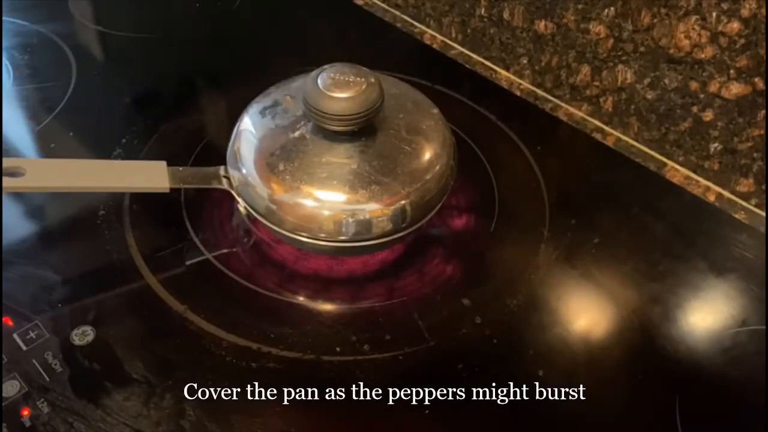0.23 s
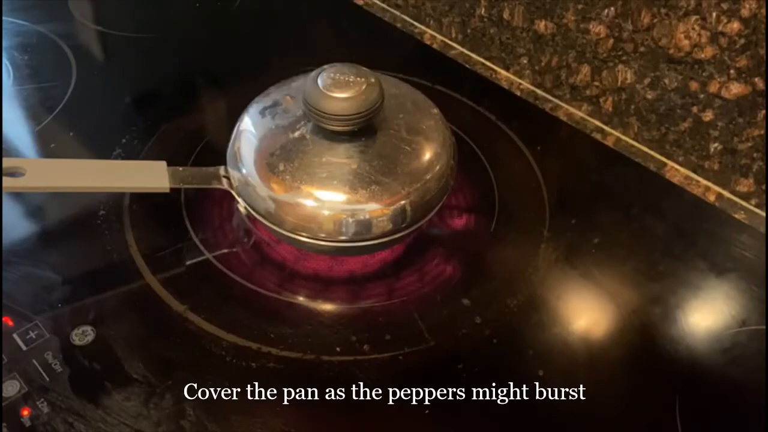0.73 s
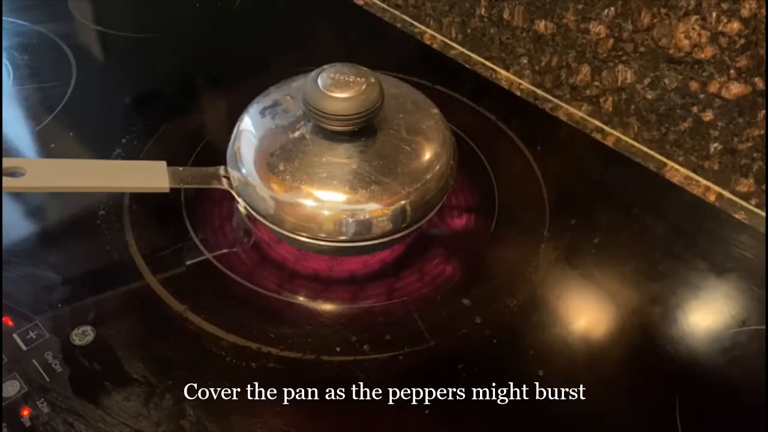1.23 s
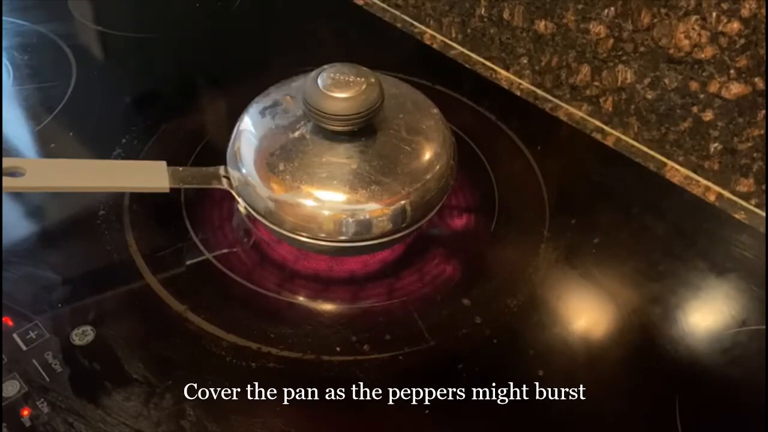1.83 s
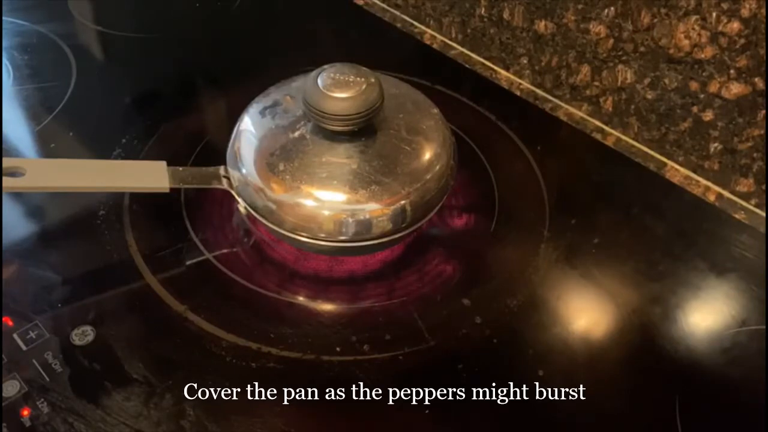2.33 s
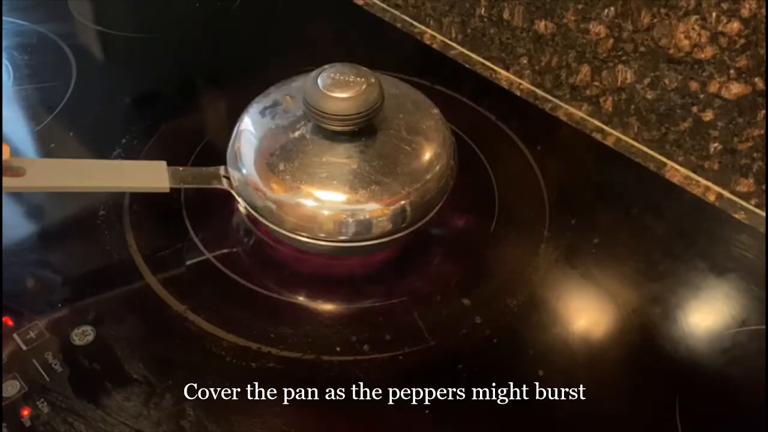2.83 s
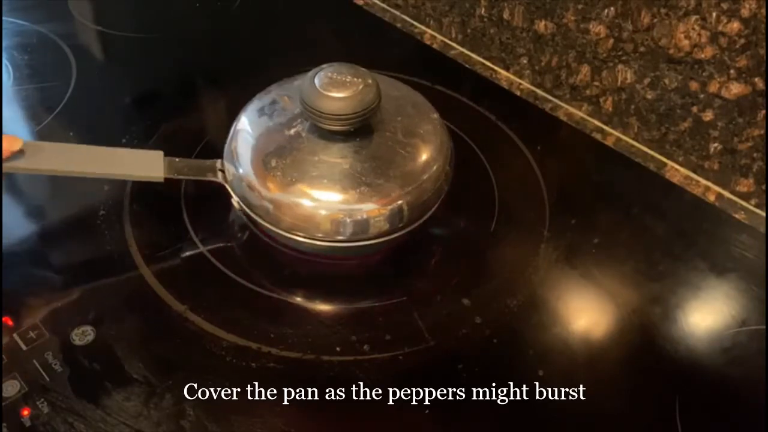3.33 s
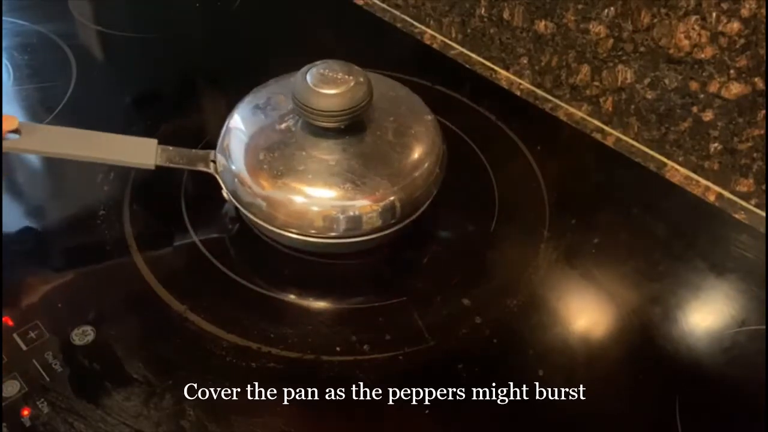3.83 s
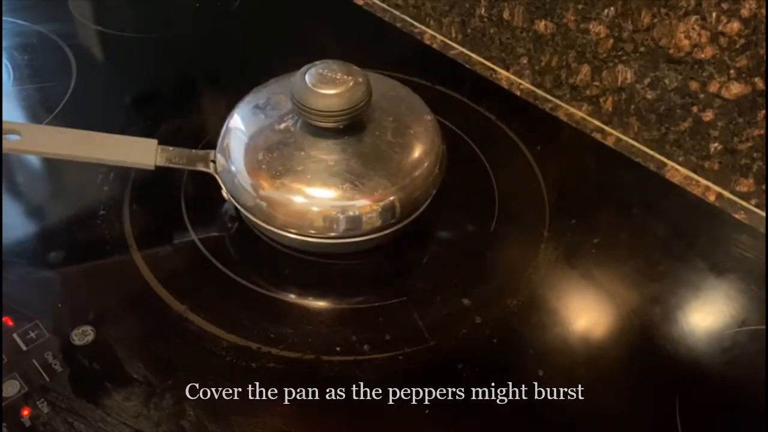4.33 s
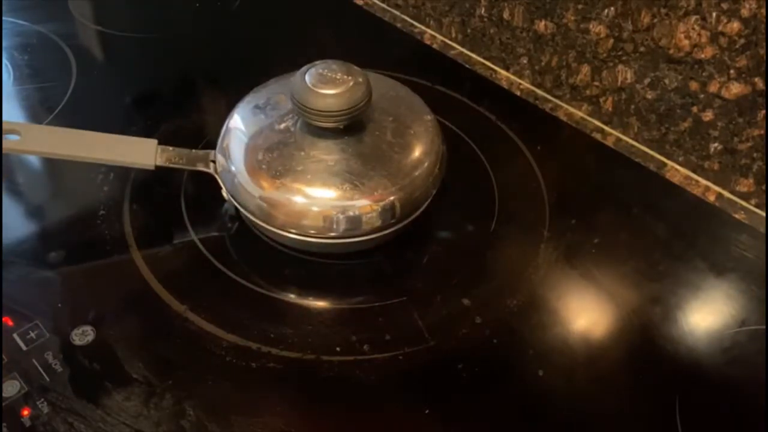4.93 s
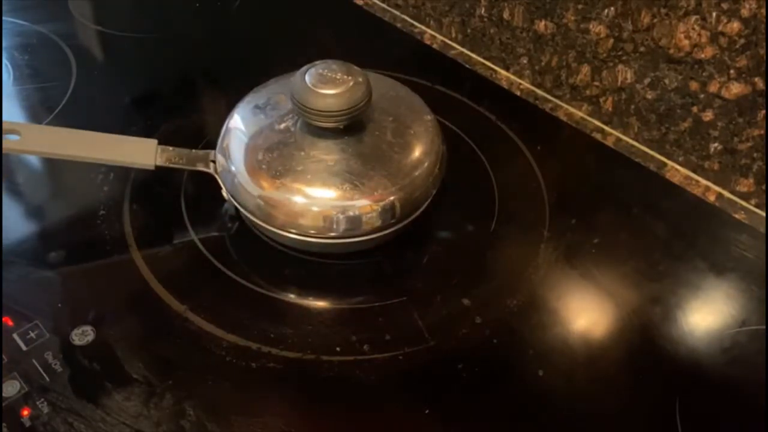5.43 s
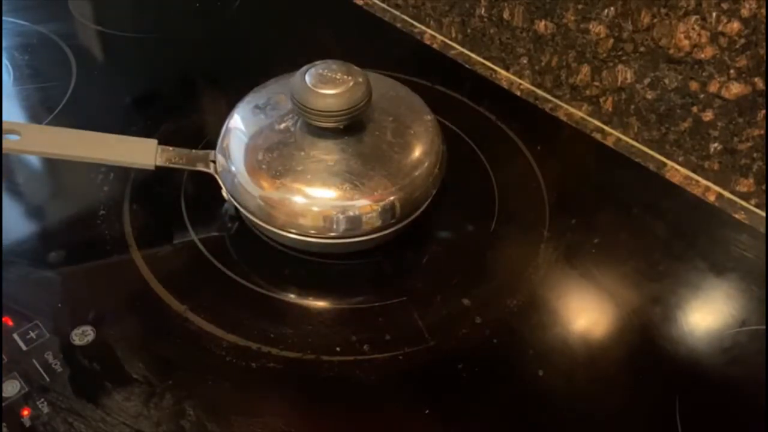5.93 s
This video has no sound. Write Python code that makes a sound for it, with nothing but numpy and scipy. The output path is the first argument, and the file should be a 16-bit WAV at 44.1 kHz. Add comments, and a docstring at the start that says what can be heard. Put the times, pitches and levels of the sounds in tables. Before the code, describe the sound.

A kitchen fan runs throughout, a steady low hum and rumble with a softer rush of air. In front of it, peppers fry quietly in a small covered steel pan. Oil spits against the lid from start to finish, making faint, high, gritty crackles, several a second at uneven intervals, each with a trace of metallic ring. At about 2.2 seconds the hot metal gives a small rough tick. Around 3.3 and 3.5 seconds the pan is nudged, rubbing very softly over the glass hob. Just before 5 seconds come two sharper, dry ticks in quick succession. A fine sizzle builds under the lid from about 4.6 seconds, flaring unevenly, strongest around 5.5 seconds and carrying on to the end at about 6 seconds. The whole sound is quiet and fairly close, with a short reverberation from hard kitchen walls.

```python
"""A kitchen fan hums and rushes while droplets of oil spit faintly against the lid of a small steel pan.
Peppers are frying in it on a glass hob: each bursting droplet is an impulse that excites the lid's modes,
and the hot metal slips with a few sharper ticks. The pan, nudged by its handle, rubs over the glass;
soon a fine sizzle swells under the lid as juice flashes to steam in the oil."""
import sys
import numpy as np
from scipy import signal
from scipy.io import wavfile

SR = 44100
rng = np.random.default_rng(int(sys.argv[2]) if len(sys.argv) > 2 else 0)


def to_wav(s):
    """Save 16-bit WAV."""
    ch = np.atleast_2d(s).T  # columns
    pcm = np.round(np.clip(ch, -1, 1) * 32767)  # PCM
    wavfile.write(sys.argv[1], SR, pcm.astype(np.int16))


N = 273067
TIME = np.arange(N) / SR

# large droplets: t/s, relative level/dB, spectral tilt/(dB per octave)
DROPLETS = [(.0575, -64, 1), (0.115, -55, 2), (.2055, -66, -5), (0.314, -59, -1), (.404, -72, -2),
            (.536, -59.5, -3), (.602, -67, 10), (.644, -60, 4), (.7333, -57, -11), (.8, -57.5, -10),
            (.866, -58.5, -1), (.909, -56, -3), (.997, -64, -1), (1.04, -55, 0), (1.06, -63, 1),
            (1.172, -56.5, -3), (1.246, -72, -1), (1.2615, -63, -5), (1.327, -65, 4), (1.394, -65, -1),
            (1.5265, -60, 3), (1.591, -57, -2), (1.658, -67, 1), (1.701, -60, -2), (1.858, -62, -3),
            (1.898, -61, -2), (1.972, -64, -4), (1.988, -66, -2), (2.121, -66, 5), (2.362, -55.5, -4),
            (2.4505, -59.5, 0), (2.649, -63, 0), (2.7792, -57, -3), (2.978, -57.5, -6), (3.044, -61, 0),
            (3.086, -54, 4), (3.227, -66, -5), (3.3225, -57, -6), (3.3505, -56, 3), (3.439, -60, -5),
            (3.4825, -59.5, -4), (3.572, -61.5, -12), (3.706, -62, 1), (3.745, -55.5, -2), (3.8205, -66, 6),
            (3.835, -63, -5), (3.899, -70, -5), (3.955, -66, -2), (4.038, -55.5, 0), (4.098, -56, -5),
            (4.1405, -55.5, -5), (4.228, -59.5, -5), (4.287, -64, -4), (4.344, -64, -8), (4.361, -55.5, -4),
            (4.426, -58.5, -14), (4.6, -53.5, -1), (4.74, -63, -2), (4.931, -52, -11), (5.061, -54, 8),
            (5.193, -52.5, 0), (5.345, -55, 1), (5.4135, -57, -5), (5.534, -53, -2), (5.937, -57, 0),
            (6.178, -56, 0)]
# bands of their spray: f/Hz, width/Hz, relative level/dB
SPRAY_BANDS = [(3400, 1500, -7), (4700, 1700, -2.5), (6000, 2000, -5), (7600, 2000, -5), (9300, 2000, -3.5),
               (10700, 1500, -9.5)]
def spits(rise_s=.0006, t60=.04, pivot_hz=6000, tiny_per_s=92):
    """Impulsive excitation: each droplet bursts in a gritty spray of noise and briefly rings the lid."""
    rate = tiny_per_s * from_db(6.5 * drift(5.3))  # tiny droplets burst at random, in flurries
    tiny = (rng.random(N) < rate / SR) * from_db(-72.5 + 1.5 * np.clip(rng.standard_normal(N), -2, 2))
    grit = rms_one(from_db(3 * drift(500)))
    decay, lag = np.exp(-np.log(1000) / (t60 * SR)), np.exp(-1 / (rise_s * SR))

    def spray(hz):
        """Incoherent bursts add in power; their tilts set their strength at this frequency."""
        bursts = tiny.copy()
        for s, level_db, tilt_db in DROPLETS:
            bursts[int(s * SR)] += from_db(level_db + tilt_db * np.log2(hz / pivot_hz))
        power = signal.lfilter([1 - lag], np.convolve([1, -decay ** 2], [1, -lag]), bursts ** 2 + 1e-18)
        return np.sqrt(power) * grit * rng.standard_normal(N)

    splash = sum(from_db(level_db - 4.5 + 3 * drift(11)) * resonance(spray(hz), hz, width_hz)
                 for hz, width_hz, level_db in SPRAY_BANDS)
    ringing = from_db(-31.5) * lid(spray(pivot_hz))
    return kitchen(pan(1.4) * (splash + ringing), wet_db=-8.5)


# modes of the lid: f/Hz, relative level/dB, T60/s
LID_MODES = [(4080, -14, .03), (4280, -.5, .021), (5220, -3.5, .019), (5570, -6, .02), (5780, -17, .03),
             (6320, -17, .04), (6990, -2.5, .019), (8350, -2, .02), (9500, -9, .02), (9950, -12, .03),
             (11550, -18, .025)]
def lid(force):
    """Modal response: blows land in different places, so the modes answer differently each time."""
    return sum(ring(force * from_db(level_db + 3.5 * drift(14)), hz, t60)
               for hz, level_db, t60 in LID_MODES)


# parts of three ticks, levels relative: t/s, crack level/dB, snap level/dB, crack T60/s, rise/s,
# f/Hz, width/Hz, ring level/dB, left-right/dB
TICK_PARTS = [(2.169, -69, -120, .05, .003, 7000, 7000, -120, 2),
              (2.1775, -60, -120, .055, .002, 10200, 2200, -84, 2),
              (2.1778, -60, -120, .055, .002, 6800, 7000, -120, 2),
              (2.1783, -54, -120, .052, .003, 5700, 900, -120, 4),
              (2.1795, -63, -120, .05, .003, 6330, 350, -120, 4),
              (2.18, -56, -120, .05, .003, 4050, 500, -120, 3),
              (2.181, -53, -120, .05, .004, 2450, 2400, -120, 3),
              (4.8763, -120, -23.5, .004, .0003, 2600, 5500, -120, 4.5),
              (4.8782, -56.5, -120, .045, .001, 3600, 5000, -120, 3),
              (4.9562, -51, -27.5, .008, .0004, 8500, 7000, -120, .5),
              (4.9575, -54, -120, .085, .002, 7600, 6500, -58, .5),
              (4.977, -56.5, -120, .05, .008, 10400, 1800, -120, 0)]
# high modes of the pan: f/Hz, relative level/dB, T60/s
PAN_MODES = [(8400, -10, .07), (9938, 0, .19), (10380, -1, .1), (10540, -3, .14), (11300, 1, .12)]
def ticks():
    """Stick-slip: hot steel gives with a dry snap or gritty crack that stirs the lid; the pan rings on."""
    out = 0
    for s, crack_db, snap_db, t60, rise_s, hz, width_hz, ring_db, balance_db in TICK_PARTS:
        grit = rms_one(resonance(rng.standard_normal(N), hz, width_hz))
        crack = grit * swell(s, rise_s, crack_db, rise_s, t60)
        click = (np.arange(N) == int(s * SR)) + 1e-12
        snap = from_db(snap_db) * resonance(click, hz, width_hz)
        steel = sum(ring(click * from_db(ring_db + mode_db), mode_hz, mode_t60)
                    for mode_hz, mode_db, mode_t60 in PAN_MODES)
        out = out + pan(balance_db) * (crack + snap + steel)
    return kitchen(from_db(-1) * out + from_db(-54) * lid(out), wet_db=-10.5)


# juice runs into the oil and boils off: t/s, duration/s, level/dB, T60/s
JUICE_FLARES = [(0.646, 0.24, -77.5, 0.3), (1.696, .24, -80, .27), (2.16, 0.11, -75, 0.29),
                (4.55, 0.15, -72, 0.74), (4.804, .19, -66.5, 0.53), (5.094, 0.2, -66, .23),
                (5.22, 0.12, -65.5, .12), (5.33, 0.11, -76, .27), (5.44, 0.16, -63, .25),
                (5.58, 0.37, -66.5, .27), (5.75, 0.31, -70, 0.3), (5.887, 0.26, -68, 0.3)]
# spectrum of the hiss: f/Hz, relative level/dB
SIZZLE_SPECTRUM = [(1500, 10.5), (2500, 2), (4000, 2), (5700, 0), (7500, 1), (9000, 1.5), (10500, -2),
                   (11700, 2)]
def sizzle(simmer_db=-90, attack_s=.062):
    """Flash boiling: countless tiny bursts merge into a grainy hiss that flares as juice turns to steam."""
    grain = rms_one(from_db(-.6 * drift(300)))
    flare_power = sum(swell(s, length_s, level_db, attack_s, t60) ** 2
                      for s, length_s, level_db, t60 in JUICE_FLARES)
    envelope = np.sqrt(from_db(simmer_db) ** 2 + flare_power)
    return envelope * grain * banded_noise(SIZZLE_SPECTRUM, flicker_db=1.5, count=12)


# nudges of the handle: t/s, duration/s, level/dB
PAN_NUDGES = [(3.255, 0.11, -67), (3.453, 0.025, -68)]
# spectrum of steel rubbing on glass: f/Hz, relative level/dB
RUB_SPECTRUM = [(1500, 0), (3200, 2), (5000, -10), (7500, -9), (12000, -35)]
def slide():
    """Sliding friction: the base of the pan rubs briefly over the glass at each nudge."""
    rub = banded_noise(RUB_SPECTRUM, flicker_db=1, count=6)
    return rub * sum(swell(s, length_s, level_db, attack_s=.034, t60=.31)
                     for s, length_s, level_db in PAN_NUDGES)


# spectra of the fan's low rumble and softer rush: f/Hz, relative level/dB
RUMBLE_SPECTRUM = [(15, -43.5), (35, -21), (50, -13), (70, -0.5), (84, -2), (105, 0.5), (140, -4),
                   (168, -17.5), (195, -4.5), (225, -17.5), (265, -8.5), (310, -21.5)]
RUSH_SPECTRUM = [(310, 1.5), (430, -3.5), (560, -0.5), (660, 1.5), (760, 0), (850, -8.5), (1050, -4.5),
                 (1300, -13), (2000, -13.5), (2400, -21), (3000, -22.5), (4000, -31), (6500, -41),
                 (11700, -54.5)]
# air modes of the duct: f/Hz, nominal width/Hz, level/dB, left-right/dB
DUCT_MODES = [(145.5, 8.2, -52.5, -1.5), (190.5, 20, -54.5, -3.5), (494.5, 14, -67, -11),
              (620.8, 22, -67, 8), (669, 52, -66, 3), (925.4, 55, -67, 1.5)]
def fan_air():
    """Flow noise: the fan's air rumbles and rushes over a broad band, and resonates in the duct."""
    rumble = from_db(-43.5) * banded_noise(RUMBLE_SPECTRUM, flicker_db=1.27, count=26)
    rush = from_db(-53.5) * banded_noise(RUSH_SPECTRUM, flicker_db=1.5, count=30)
    duct = 0
    for hz, width_hz, level_db, balance_db in DUCT_MODES:
        stir = rng.standard_normal(N) + .5 * rng.standard_normal((2, N))
        mode = rms_one(resonance(stir, hz, 1.39 * width_hz))
        duct = duct + from_db(level_db) * pan(balance_db) * mode
    return rumble + rush + duct


# steady tones: f/Hz, level/dB, left-right/dB, phase lead of left/rad, unsteadiness (0-1)
HUM_TONES = [(91, -52, -1.5, 0, .3), (120, -41.7, -1.5, .1, .08), (240, -54.5, -5, .45, .15),
             (258, -55.5, -6.5, .5, .4), (360, -74, -5, 1.5, .3), (480, -70, -3, .8, .3),
             (720, -69.5, 1, .6, .25), (2879, -90, 5, 1.5, .4)]
def hum():
    """Superposition: mains harmonics and fan tones add, each wavering a little in level and phase."""
    out = 0
    for hz, level_db, balance_db, lead, unsteady in HUM_TONES:
        phase = 2 * np.pi * (hz * TIME + rng.random()) + unsteady * drift(.7)
        level = from_db(level_db) * rms_one(1 + unsteady * drift(2.5))
        out = out + np.sqrt(2) * level * pan(balance_db) * np.sin(phase + np.array([[.5], [-.5]]) * lead)
    return out


def kitchen(x, wet_db, t60=.45):
    """Reverberation: dense reflections from hard walls decay exponentially, differently at each ear."""
    t = TIME[:SR // 2]
    tail = rng.standard_normal((2, len(t))) * np.exp(-np.log(1000) * t / t60) * (t > .003)
    tail /= np.sqrt(np.sum(tail ** 2, axis=1, keepdims=True))
    return x + from_db(wet_db) * signal.fftconvolve(x.mean(axis=0, keepdims=True), tail, axes=1)[:, :N]


# likeness of the noise at the two ears: f/Hz, correlation
EAR_CORRELATION = [(60, 0.99), (140, 1), (200, 0.94), (300, 0.14), (400, 0.49), (650, 0.44), (1000, 0.27),
                   (1800, 0.74), (4000, 0.52), (7000, 1), (10000, 1)]
# its balance: f/Hz, left-right/dB
EAR_BALANCE = [(60, -3.5), (140, 1), (220, -3.5), (320, 0), (480, 1.5), (600, -1), (1100, 1.5), (1700, 0),
               (3000, 3), (7000, 1.5), (10000, -1)]
def banded_noise(spectrum, flicker_db, count):
    """Partial coherence: each flickering band mixes noise common and opposite at the two ears; rms 1."""
    out, edges = 0, np.geomspace(spectrum[0][0], spectrum[-1][0], count + 1)
    white = rng.standard_normal((2, 2, N))  # neighbouring bands get unrelated noise
    for k, (low, high) in enumerate(zip(edges, edges[1:])):
        band = signal.butter(2, [low, high], "band", fs=SR, output="sos")
        mid, side = signal.sosfilt(band, white[k % 2])
        hz = np.sqrt(low * high)
        alike = at_hz(EAR_CORRELATION, hz)
        gain = from_db(at_hz(spectrum, hz) + flicker_db * drift(16.5)) * pan(at_hz(EAR_BALANCE, hz))
        out = out + gain * (np.sqrt(1 + alike) * mid + np.sqrt(1 - alike) * side * [[1], [-1]])
    return rms_one(out)


def ring(force, hz, t60):
    """Damped oscillator: a unit impulse starts a decaying sine of amplitude 1."""
    r, w = np.exp(-np.log(1000) / (t60 * SR)), 2 * np.pi * hz / SR
    return signal.lfilter([0, np.sin(w)], [1, -2 * r * np.cos(w), r * r], force + 1e-18)


def resonance(x, hz, width_hz):
    """Two resonators in cascade, each of this width and of peak gain 1."""
    r = np.exp(-np.pi * width_hz / SR)
    b = np.array([1, 0, -1]) * (1 - r * r) / 2
    a = [1, -2 * r * np.cos(2 * np.pi * hz / SR), r * r]
    return signal.lfilter(b, a, signal.lfilter(b, a, x))


def swell(s, length_s, level_db, attack_s, t60):
    """Envelope: a linear rise, a hold until its length is over, then exponential decay."""
    rise = np.clip((TIME - s) / attack_s, 0, 1)
    fall = np.exp(-np.log(1000) * np.clip((TIME - s - length_s) / t60, 0, 10))
    return from_db(level_db) * rise * fall


def drift(rate_hz):
    """Random modulation: low-passed noise of rms about 1."""
    r = np.exp(-80 * np.pi * rate_hz / SR)  # computed at every 40th sample
    slow = signal.lfilter([1], [1, -2 * r, r * r], rng.standard_normal(N // 40 + 2002))[2000:]
    return np.interp(np.arange(N) / 40, np.arange(len(slow)), rms_one(slow))


def at_hz(points, hz):
    """Interpolation on a log-frequency axis."""
    freqs, values = np.transpose(points)
    return np.interp(np.log(hz), np.log(freqs), values)


def pan(balance_db):
    """Interaural level difference as left and right gains."""
    return from_db(np.array([[.5], [-.5]]) * balance_db)


def from_db(db):
    """Level to amplitude ratio."""
    return 10 ** (np.asarray(db) / 20)


def rms_one(x):
    """Normalisation to rms 1."""
    return x / np.sqrt(np.mean(x ** 2) + 1e-20)


def scene():
    """Superposition: the frying pan in front of the steady fan."""
    return spits() + ticks() + sizzle() + slide() + fan_air() + hum()


# edges of the band in antiphase: lower f/Hz, upper f/Hz
ANTIPHASE_BAND = [8120, 10030]
def record(dry, cutoff_hz=11750):
    """Phase inversion: the channels oppose in one narrow treble band; a steep low-pass cuts the top."""
    inside = signal.sosfilt(signal.butter(3, ANTIPHASE_BAND, "bandpass", fs=SR, output="sos"), dry)
    outside = signal.sosfilt(signal.butter(3, ANTIPHASE_BAND, "bandstop", fs=SR, output="sos"), dry)
    heard = outside + inside * [[1], [-1]]
    return signal.sosfilt(signal.ellip(8, .2, 60, cutoff_hz, fs=SR, output="sos"), heard)


dry = scene()
out = record(dry)
to_wav(out)
```